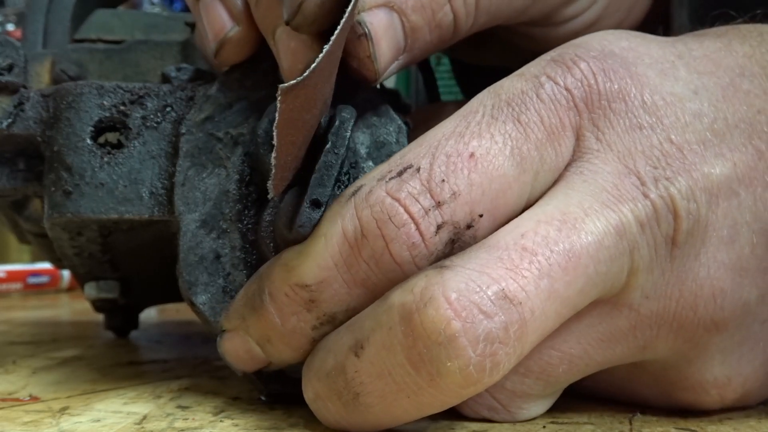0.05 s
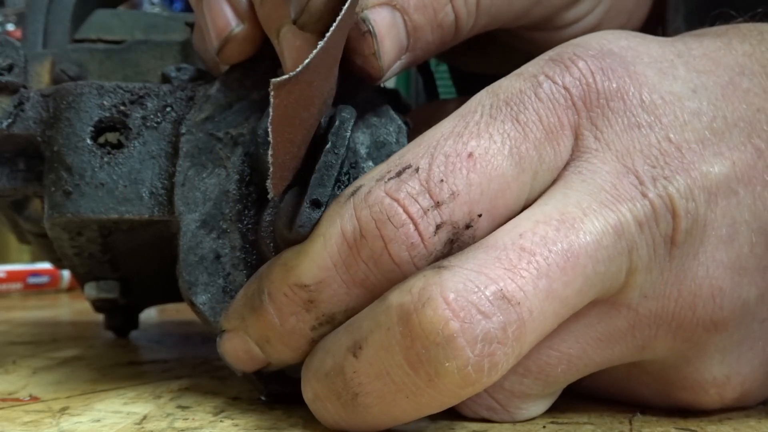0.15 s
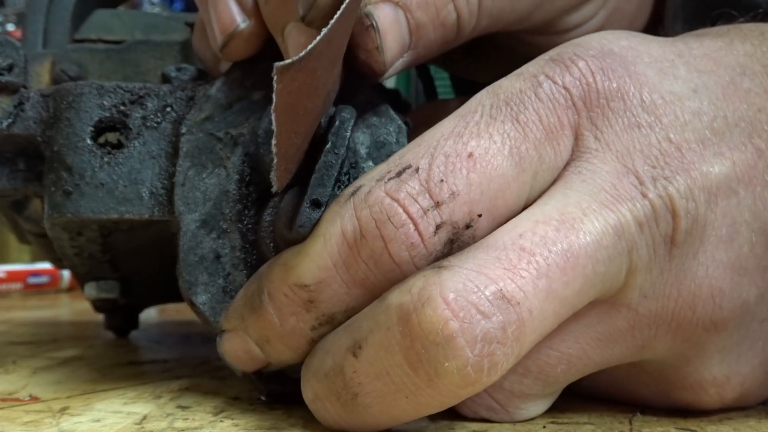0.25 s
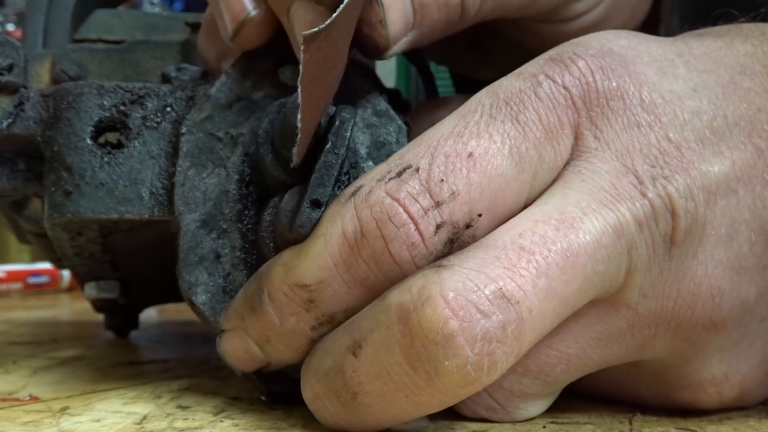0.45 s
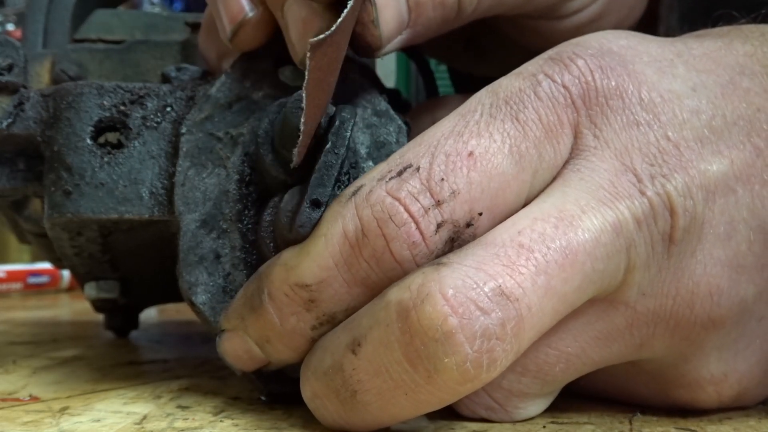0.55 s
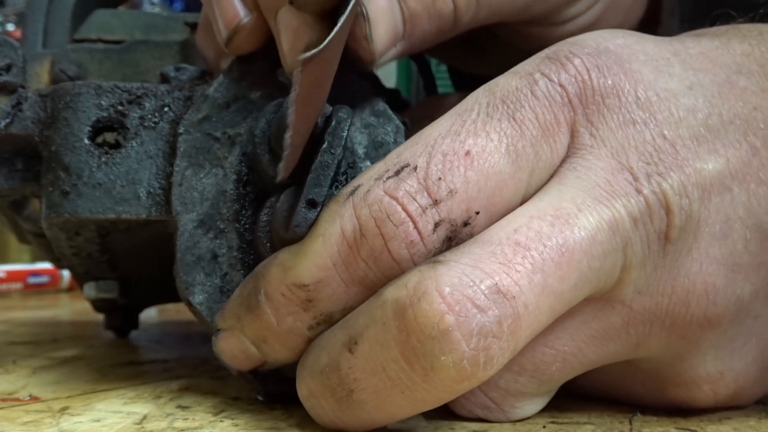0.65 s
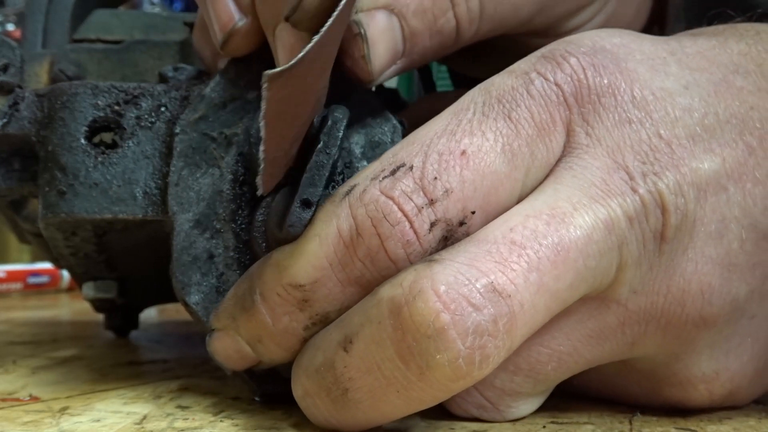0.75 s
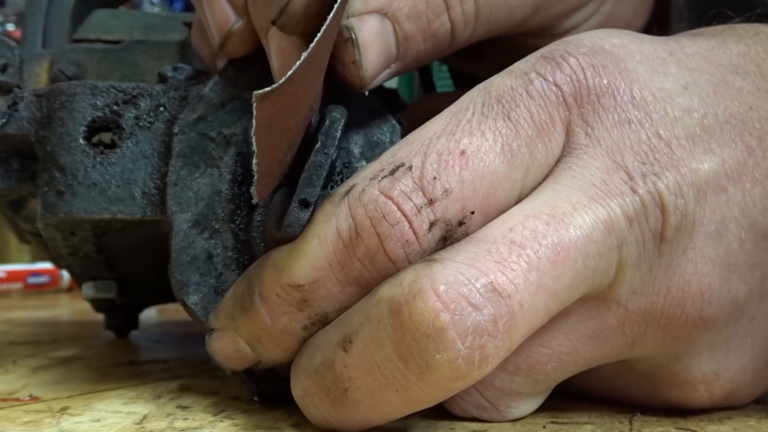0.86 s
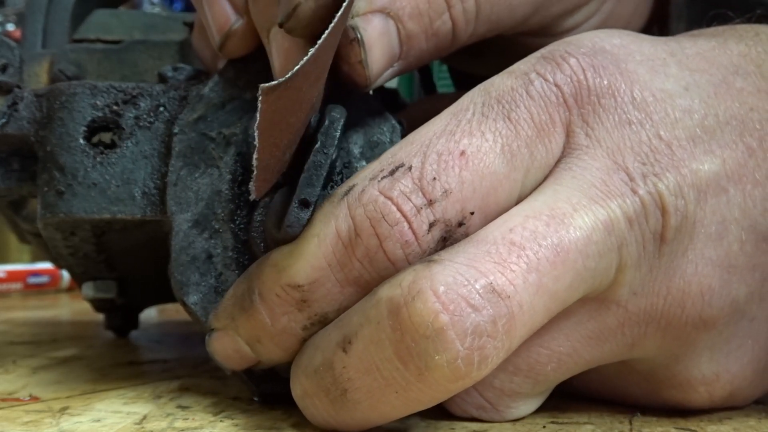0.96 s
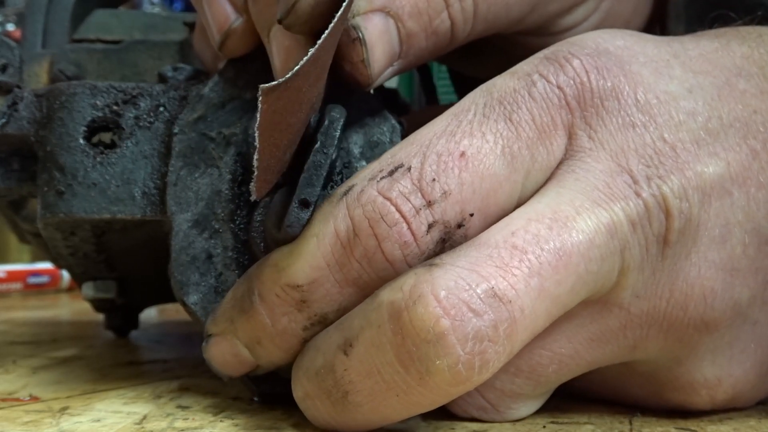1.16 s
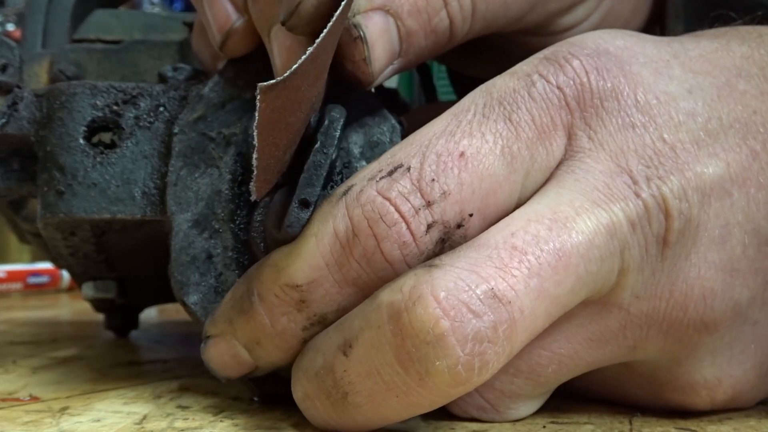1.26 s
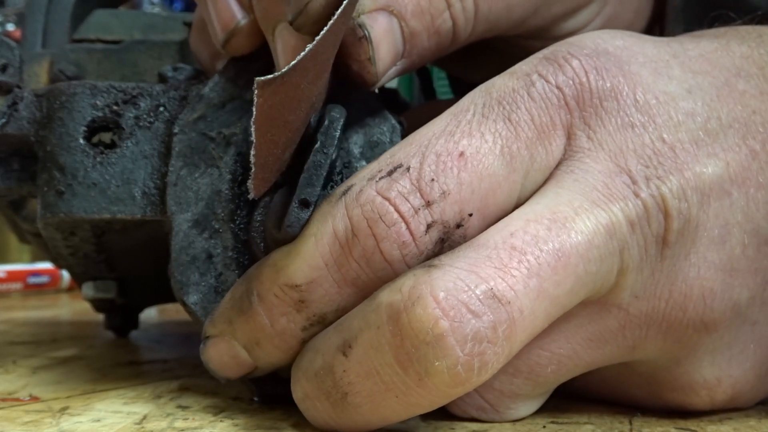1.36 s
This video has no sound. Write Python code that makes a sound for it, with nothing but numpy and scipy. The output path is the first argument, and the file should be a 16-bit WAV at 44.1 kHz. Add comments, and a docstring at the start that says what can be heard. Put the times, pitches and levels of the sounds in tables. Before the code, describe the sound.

Sandpaper rasps in short, jerky strokes across small metal contacts, very close.

```python
"""A small workshop, stereo microphone very close to an engine part on the bench; a steady hum lies behind.
From 0.2 s a folded strip of sandpaper catches in short jerks between the part's small metal contacts:
grit rings the metal, each snag knocks the hollow housing, and the part rocks softly on the bench.
Around 0.4 s the paper tears through in one hard pull. From 0.65 s it slides back more gently, with a
whisper, and by about 0.9 s it stops, leaving the room's air and hum."""
import sys
import numpy as np
from scipy import signal
from scipy.fft import rfft, irfft, next_fast_len
from scipy.io import wavfile

SR = 44100
rng = np.random.default_rng(int(sys.argv[2]) if len(sys.argv) > 2 else 0)


def store_pcm(level_fs):
    """Save levels as 16-bit WAV."""
    pcm = np.round(np.clip(level_fs, -1, 1) * 32767).astype(np.int16)
    wavfile.write(sys.argv[1], SR, np.atleast_2d(pcm).T)


N = 61739
T = np.arange(N) / SR
RING_T = T[:N // 3]  # time axis of one ring
FFT_SIZE = next_fast_len(2 * N, real=True)
FREQ = np.maximum(np.arange(FFT_SIZE // 2 + 1) * SR / FFT_SIZE, 1)


def undb(db):
    """Decibels to gain."""
    return 10 ** (np.asarray(db) / 20)


def unit(x):
    """Scale to rms 1."""
    return x / np.sqrt(np.mean(x ** 2))


def curve(points):
    """Join (Hz, dB) points on a log-frequency axis."""
    hz, db = np.array(points).T
    return np.interp(np.log(FREQ), np.log(hz), db)


def shaped(noise, gain):
    """Colour noise with a gain per frequency."""
    return irfft(rfft(noise, FFT_SIZE) * gain)[:N]


def rolloff(x, hz, kind="low", order=1):
    """Gentle low-pass or high-pass."""
    return signal.sosfilt(signal.butter(order, hz, kind, fs=SR, output="sos"), x)


def response(db):
    """Minimum-phase impulse response with the given gain curve."""
    cepstrum = irfft(np.log(undb(db)))[:N]
    cepstrum[0] /= 2
    return irfft(np.exp(rfft(2 * cepstrum, FFT_SIZE)))[:len(RING_T)]


def through(x, ring):
    """Play x through an impulse response scaled to unit energy."""
    ring = np.atleast_2d(ring)
    energy = np.mean(np.sum(ring ** 2, axis=1))
    return signal.fftconvolve(np.atleast_2d(x), ring / np.sqrt(energy), axes=1)[:, :N]


def modes(table, stretch=1, sustain=1):
    """One ring of decaying sines; stretch scales their pitch, sustain their T60."""
    return sum(undb(db - 60 * RING_T / (t60 * sustain)) * np.sin(2 * np.pi * hz * stretch * RING_T)
               for hz, t60, db in table)


def spread(side):
    """A side signal as left and right."""
    return side * np.array([[1], [-1]])


def add(out, start, sound):
    """Mix a sound in at its start in seconds."""
    i = int(start * SR)
    out[i:i + len(sound)] += sound[:N - i]


# The air of the workshop. Each row: frequency in Hz, relative noise density in dB.
AIR_SPECTRUM = [(15, -28), (25, -13), (59, -6.5), (97, -6.5), (309, -12), (405, -11), (439, -5),
                (476, -10.5), (695, -17.5), (1040, -13.5), (1400, -28), (5280, -34), (16000, -46.5)]
def workshop_air(level_db=-55.5, wide_above_hz=1850):
    """Steady air noise around the microphone, centred in the bass and wide in the treble."""
    mid, side = rng.standard_normal((2, N))
    gain = undb(curve(AIR_SPECTRUM))
    side_gain = gain * FREQ / np.hypot(FREQ, wide_above_hz)
    return undb(level_db) * unit(shaped(mid, gain) + spread(shaped(side, side_gain)))


# The hum behind the bench. Each row: centre in Hz, width in Hz, rms level in dB.
HUM_BANDS = [(57.1, 19, -63), (478.9, 8.9, -60), (527.5, 36, -64.5)]
def workshop_hum():
    """Narrow resonances of noise make a wavering hum."""
    hum = np.zeros(N)
    for hz, width, db in HUM_BANDS:
        resonance = 1 / (1 + (2 * (FREQ - hz) / width) ** 2)
        hum += undb(db) * unit(shaped(rng.standard_normal(N), resonance))
    return hum


# Slips of the paper, right at the microphone. Each row: start in seconds, length in seconds,
# level in dB, treble over bass in dB, drag on the housing in dB relative to that level.
PAPER_SLIPS = [(0.226, 0.2, -60.5, 12, -4), (0.2347, 0.0035, -43.5, 12.5, 6), (0.242, .003, -42, 10, 4.5),
               (0.259, 0.009, -54, 8, -6), (0.2757, 0.0097, -45.5, 17, 9.5), (0.3082, 0.0068, -39, 11.5, 1),
               (0.341, 0.0017, -45.5, 15, -12), (0.3657, 0.0031, -45.5, 15.5, 11.5),
               (0.394, 0.0087, -34.5, 11, 4), (0.405, .008, -29, 3, -7), (0.412, 0.0086, -34.5, 11, -4),
               (0.424, 0.023, -39, 2, 7.5), (0.4289, 0.001, -38, 6, 10), (0.45, 0.0079, -45, 5, 14),
               (0.4607, 0.0027, -33.5, 13.5, -27), (0.4632, 0.006, -33.5, -8, 6),
               (0.47, 0.038, -57, 10, 10.5), (0.51, 0.068, -63.5, 2, 0), (0.6518, 0.01, -49.5, -5, 11),
               (0.6621, 0.012, -47, -9, 10.5), (0.674, 0.032, -45.5, -3.5, -11),
               (0.7053, 0.0092, -45.5, 6, 2), (0.712, 0.016, -47.5, 5, 6.5), (0.73, 0.037, -56, 5, 7),
               (0.765, 0.0017, -58, 4, 3), (0.774, 0.051, -59, -5, 14), (0.829, 0.0017, -49, 7.5, 3),
               (0.837, 0.056, -65, 5, 14)]
def slip_pressure(attack_s=0.00061, release_s=0.0028):
    """The paper breaks loose, slides and stops: one envelope per slip."""
    envelopes = []
    for start, length, db, _, _ in PAPER_SLIPS:
        attack = np.clip((T - start) / attack_s, 0, 1)
        release = np.exp(-np.maximum(T - start - length, 0) / release_s)
        envelopes.append(undb(db) * attack * release)
    return np.array(envelopes)


def grains(per_s=12000, spread_db=4.5, chatter_per_s=450, chatter_db=2.0):
    """Abrasive grains of uneven size strike the metal edge in quick clusters."""
    hit = rng.random(N) < per_s / SR
    size = undb(spread_db * np.minimum(rng.exponential(size=N), 2.15))
    polarity = np.sign(rng.standard_normal(N))
    chatter = np.interp(T * chatter_per_s, np.arange(N), rng.standard_normal(N))
    return unit(hit * size * polarity * undb(chatter_db * chatter))


def friction(pressure, split_hz=4650):
    """Grain impacts follow the pressure, each slip with its own brightness."""
    tilt_db = np.array(PAPER_SLIPS)[:, 3]
    grit = grains()
    bass = rolloff(grit, split_hz)
    treble = grit - bass
    return (undb(-tilt_db / 2) @ pressure) * bass + (undb(tilt_db / 2) @ pressure) * treble


# The colour of the grit up close. Each row: frequency in Hz, relative gain in dB.
GRIT_SPECTRUM = [(200, -17), (700, -8.5), (1000, -0.5), (1800, -1), (3200, 2), (6500, -0.5), (8200, -3.5),
                 (9600, -6), (11000, -7.5), (14000, -7.5), (16000, -21)]
# Resonances of the small metal parts. Each row: centre in Hz, half-width in Hz, lift in dB,
# left minus right in dB.
METAL_RESONANCES = [(1232, 121, 14, 7), (1515, 125, 10, 10), (2188, 242, 12.5, 0.5), (2534, 65, 10.5, 0),
                    (2865, 51, 4.5, 17), (3577, 66, 9.5, 1), (3885, 192, 10, 1), (4690, 260, 3.5, 3),
                    (5785, 63, 6, -4), (6310, 170, 4.5, 2), (7200, 810, 3, 1.5), (8320, 110, 1, 7),
                    (9200, 87, -15, -6), (12300, 250, -4, -10)]
# Thin steel parts that ring on a little. Each row: pitch in Hz, T60 in seconds, relative level in dB.
STEEL_MODES = [(1278, 0.22, 9), (1992, 0.28, 2.5), (2174, 0.13, 9), (2565, 0.13, -8), (2563, 0.2, -9),
               (2810, 0.092, -2), (3580, 0.068, -7), (3490, 0.11, 0), (3770, 0.06, 2), (5900, 0.033, 3)]
def rasp(pressure, wide_above_hz=3460):
    """Grit rings the metal parts; its treble scatters differently to each side of the microphone."""
    force, scatter = friction(pressure), friction(pressure)
    wide = force + undb(-4) * spread(scatter - rolloff(scatter, wide_above_hz))
    humps = np.array([1 / (1 + ((FREQ - hz) / width) ** 4) for hz, width, _, _ in METAL_RESONANCES])
    _, _, lift, pan = np.array(METAL_RESONANCES).T
    metal = [response(curve(GRIT_SPECTRUM) + (lift + side * pan / 2) @ humps) for side in (1, -1)]
    return undb(-3.5) * through(wide, metal) + undb(-21) * through(force, modes(STEEL_MODES))


# The hollow housing, main mode first. Each row: pitch in Hz, T60 in seconds, relative level in dB.
HOUSING_MODES = [(489.7, 0.08, 3), (399.4, 0.062, -12), (528, 0.084, -8.5), (602.5, 0.13, -30)]
# The bench under it. Each row: pitch in Hz, T60 in seconds, relative level in dB.
BENCH_MODES = [(99.4, 0.21, -10.5), (142.2, 0.2, 2), (172.8, 0.13, 2), (242.7, .5, -3.5), (286.2, 0.26, -8)]
def grumble(pressure):
    """The paper's drag shakes the housing and, more faintly, the bench."""
    drag_db = np.array(PAPER_SLIPS)[:, 4]
    drag = (undb(drag_db) @ pressure) * rng.standard_normal(N)
    housing = through(drag, modes(HOUSING_MODES))
    bench = through(drag, modes(BENCH_MODES))
    return undb(-5.5) * housing + undb(-15.5) * bench


# Snags of the paper. Each row: start in seconds, gain in dB, the housing's main pitch in Hz,
# its T60 under the fingers in seconds, the bench's share in dB.
PAPER_SNAGS = [(0.2364, -25.5, 503.3, 0.073, -23.5), (0.244, -21, 495, 0.046, -35),
               (0.3085, -19.5, 477, 0.019, -27.5), (0.3680, -34, 500, 0.023, -16),
               (0.3956, -22, 485, 0.049, -26), (0.4310, -19.5, 493.5, 0.08, -24.5),
               (0.463, -16, 508.6, 0.042, -25), (0.6739, -26.5, 493, 0.043, -21.5),
               (0.6903, -29, 472, 0.058, -18.5), (0.7008, -26, 492, 0.039, -19),
               (0.8302, -34.5, 520, 0.029, -41)]
def snag_knocks(swell_s=0.0036):
    """Each snag jolts housing and bench, which take a moment to swing up."""
    main_hz, main_t60, _ = HOUSING_MODES[0]
    bench = modes(BENCH_MODES)
    swell = 1 - np.exp(-RING_T / swell_s)
    out = np.zeros(N)
    for start, db, hz, t60, bench_db in PAPER_SNAGS:
        housing = modes(HOUSING_MODES, stretch=hz / main_hz, sustain=t60 / main_t60)
        add(out, start, undb(db) * swell * (housing + undb(bench_db) * bench))
    return out


# Thuds of the part on the bench. Each row: start in seconds, gain in dB, pitch in Hz.
ROCKING_THUDS = [(0.317, -38.5, 98), (0.409, -29.5, 104), (0.490, -37, 54), (0.664, -28.5, 171.6),
                 (0.794, -42.5, 159)]
def rocking(swell_s=0.019, t60_s=0.14):
    """The heavy part rocks softly on the bench as the hand changes its push."""
    swell = 1 - np.exp(-RING_T / swell_s)
    out = np.zeros(N)
    for start, db, hz in ROCKING_THUDS:
        add(out, start, swell * modes([(hz, t60_s, db)]))
    return out


def return_whisper(peak_s=0.702, rise_s=0.027, fall_s=0.067, level_db=-53):
    """On the way back the lightly pressed paper hisses over the edge."""
    t = T - peak_s
    envelope = np.exp(np.minimum(t, 0) / rise_s - np.maximum(t, 0) / fall_s)
    hiss = rolloff(rng.standard_normal((2, N)), hz=9000, kind="high", order=2)
    return undb(level_db) * unit(hiss) * envelope


def room_tail(x, side_db, t60_s=0.45, delay_s=0.0074):
    """The workshop walls return a short diffuse tail to the microphone."""
    mid, side = rng.standard_normal((2, N)) * undb(-60 * T / t60_s) * (T > delay_s)
    return through(x, mid + undb(side_db) * spread(side))


def scene():
    """Rasp, knocks and thuds very close, with the walls, air and hum of the workshop behind."""
    pressure = slip_pressure()
    grit = rasp(pressure) + return_whisper()
    body = grumble(pressure) + snag_knocks() + rocking()
    grit_tail = undb(-14.5) * room_tail(rolloff(grit, hz=7500), side_db=0)
    body_tail = undb(-12.5) * room_tail(body, side_db=-13.5)
    return grit + body + grit_tail + body_tail + workshop_air() + workshop_hum()


def record(dry, rumble_hz=33.3, top_hz=16000):
    """The recorder drops the deepest rumble and cuts the top."""
    clean = rolloff(dry, rumble_hz, kind="high", order=2)
    return signal.sosfilt(signal.ellip(10, .2, 80, top_hz, fs=SR, output="sos"), clean)


dry = scene()
out = record(dry)
store_pcm(out)
```